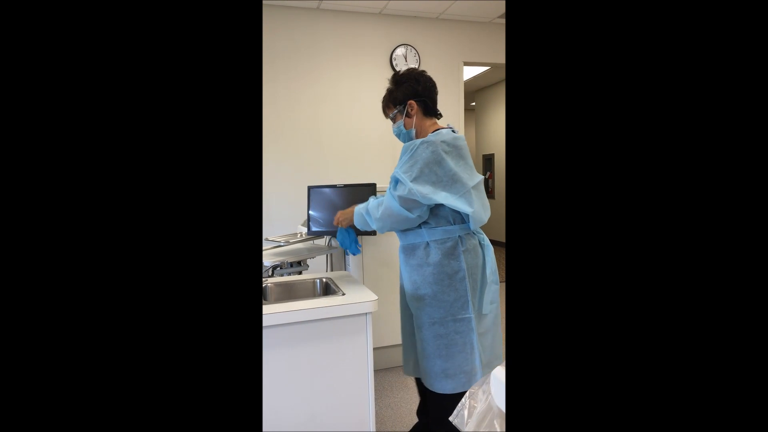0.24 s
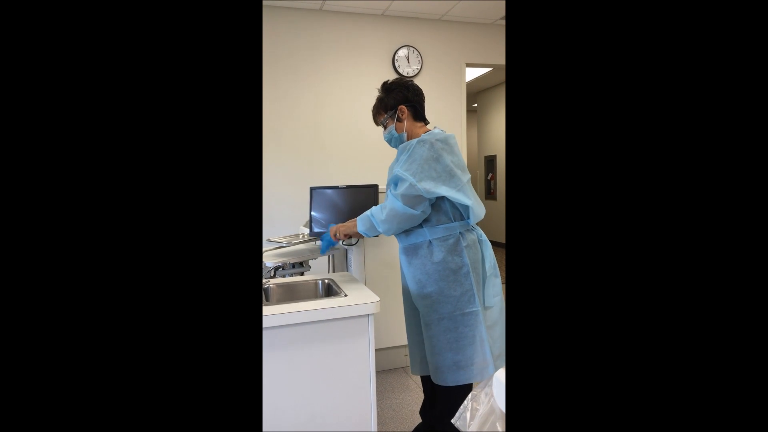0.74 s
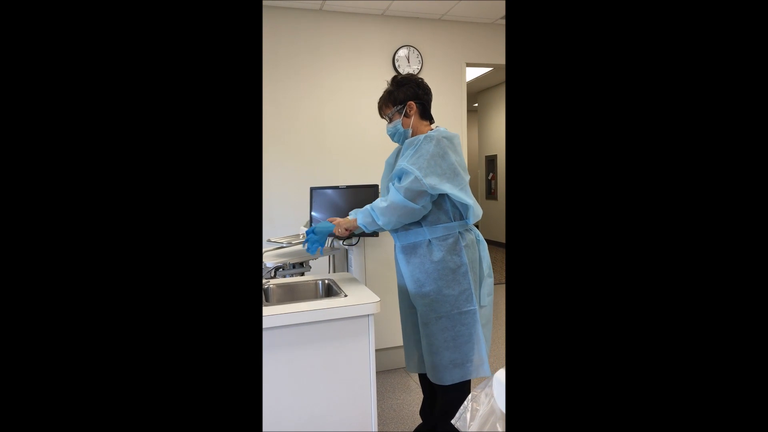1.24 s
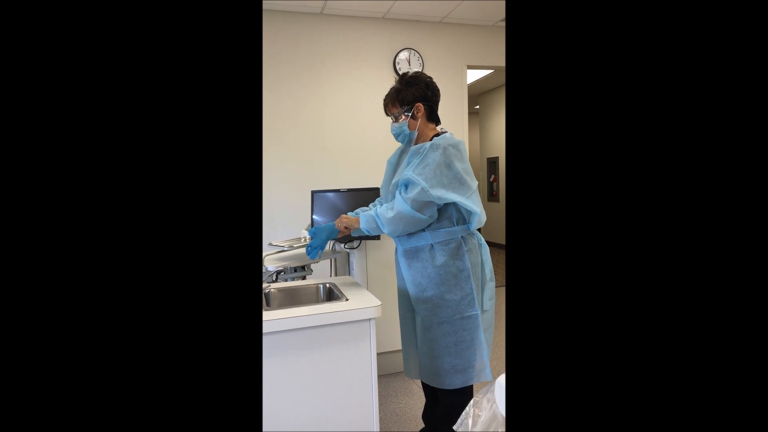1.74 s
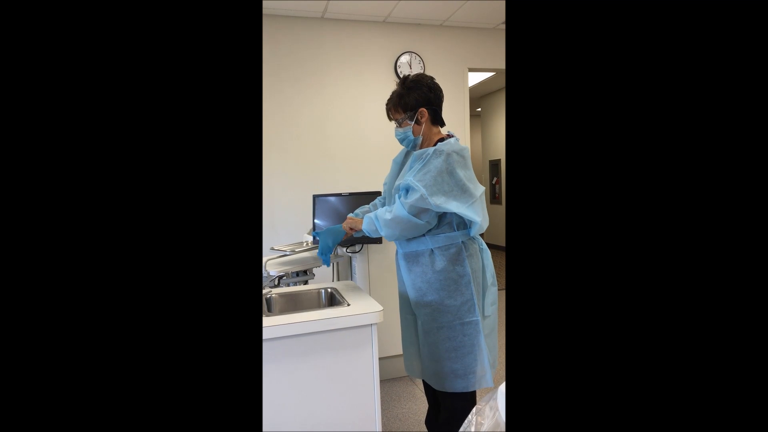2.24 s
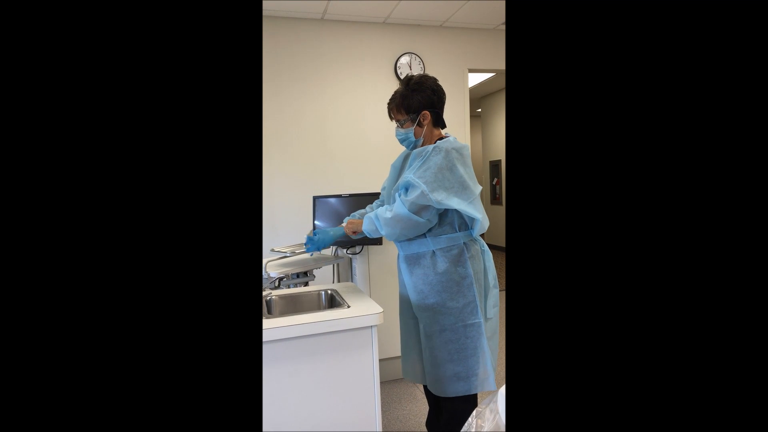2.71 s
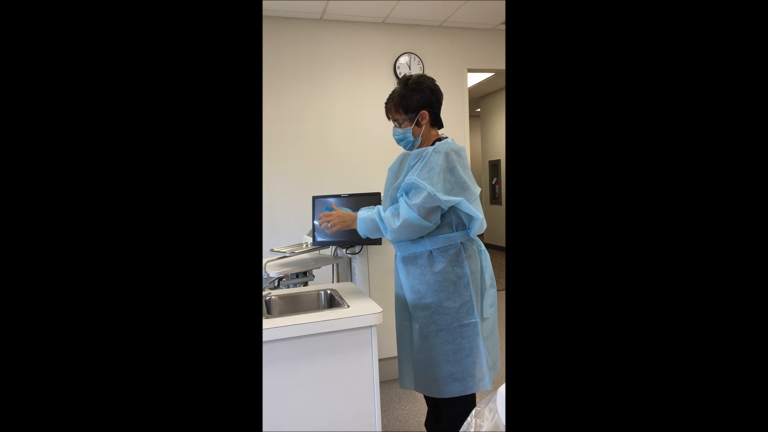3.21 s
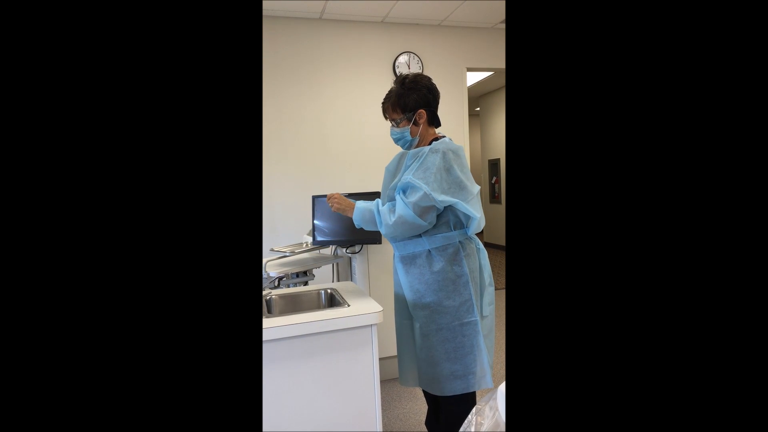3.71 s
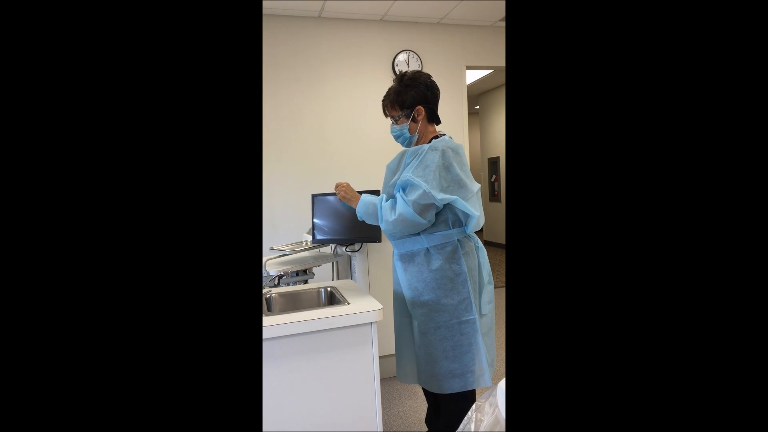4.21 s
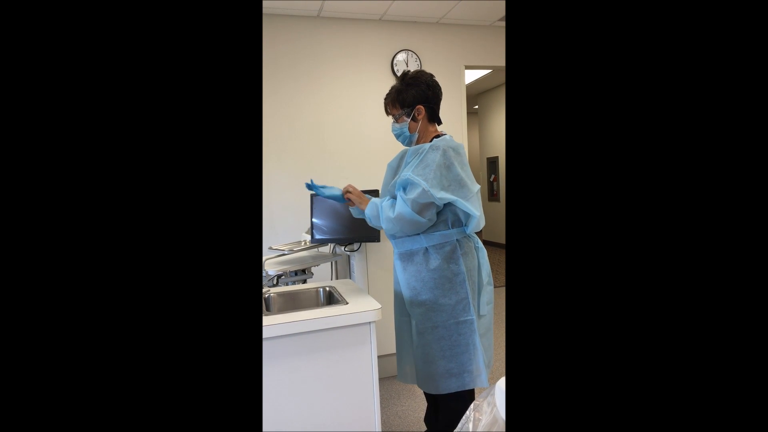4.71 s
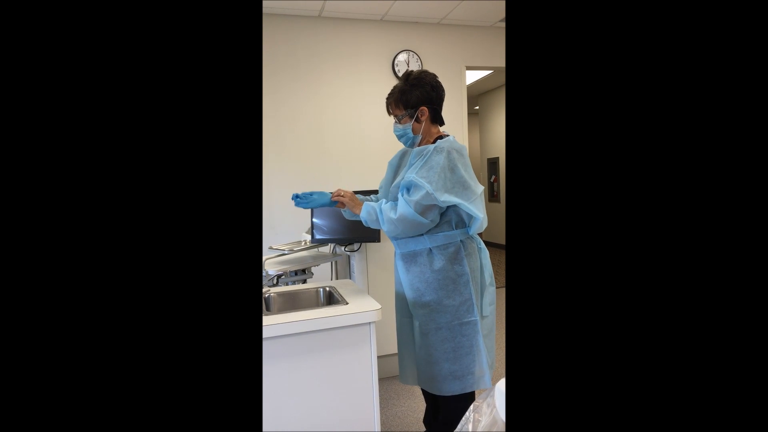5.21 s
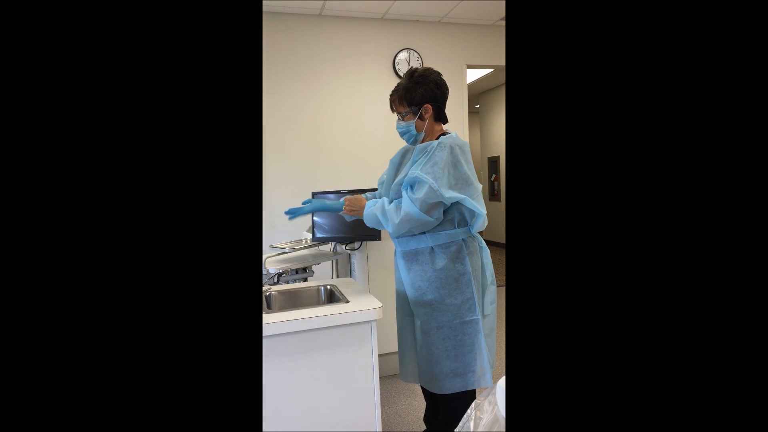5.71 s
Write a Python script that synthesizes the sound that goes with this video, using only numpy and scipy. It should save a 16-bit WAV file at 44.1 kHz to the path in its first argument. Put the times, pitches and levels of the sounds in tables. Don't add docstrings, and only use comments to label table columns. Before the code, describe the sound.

A low, even ventilation rumble runs throughout, with a very faint mains hum and soft microphone hiss. At first there are only tiny glove rustles and a small tick near 0.4 s. From about 1.15 to 1.75 s, thin film pops, puffs and crackles in small clusters, including a quick light cuff flutter at 1.3 s. A rounder, stronger pop comes at 2.2 s, a flat slap at 2.4 s, and the loudest, sharp snap at 2.67 s, followed by a looser flutter. More slaps and crackles fall at 2.85, 3.05 and 3.2 s. Then it thins to faint rubbing, with small pops near 3.9, 4.05 and 4.4 s. After a near-empty stretch, crackles at 5.6 s lead to a bright, crisp snap at 5.7 s and a little trailing rustle. Close hits have quick reflections and a short room tail; the treble occasionally dulls for an instant.

```python
import sys
import numpy as np
from scipy import signal
from scipy.fft import rfft, irfft, next_fast_len
from scipy.io import wavfile
from scipy.ndimage import uniform_filter1d, map_coordinates

SR = 44100
rng = np.random.default_rng(int(sys.argv[2]) if len(sys.argv) > 2 else 0)


def wrap_up_sound(samples):
    columns = np.atleast_2d(samples).T
    tamed = np.clip(columns, -1, 1)
    steps = np.round(tamed * 32767).astype(np.int16)
    wavfile.write(sys.argv[1], SR, steps)


def nominal_scale(level):
    x = np.asarray(level, float) / 20
    return 10 ** x


N = 262395

# frequency in Hz, density in dB per Hz.
DUCT_COLOUR = [(18, -59), (31, -11.5), (59, 3), (91, -14), (124, 3.5), (140, -3), (156, -11.5), (188, -7.5),
               (328, -19), (360, -18), (389, -26), (555, -32.5), (791, -42.5), (895, -39.5), (1200, -47.5),
               (1560, -80), (2640, -120)]
# frequency in Hz, level in dB rms.
MAINS_HUM = [(360.5, -65)]
# strongest moment in seconds, dull rustle in dB,
# bright rustle in dB, rise in seconds, fall in seconds.
STROKES = [(0.005, -66, -63, .01, 0.22), (.37, -78, -62, 0.021, .06), (1.25, -63.5, -67.5, 0.15, 0.13),
           (1.335, -52, -62, 0.12, 0.11), (1.85, -65, -73, 2.4, 0.68), (2.226, -42, -53, 0.0086, 0.03),
           (2.65, -59, -65, 0.067, 0.12), (2.68, -58, -68, 0.018, .3), (3.07, -62, -65.5, 1.8, 0.2),
           (3.55, -77, -73, 0.31, 0.81), (3.88, -58, -72, 0.015, 0.093), (4.42, -74, -74, .4, 0.094),
           (4.9, -68, -69.5, .6, 0.14), (5.6, -57, -63.5, 0.029, 0.12), (5.701, -53, -45.5, 0.03, 0.081),
           (5.8, -59, -63, .015, 0.18)]
# frequency in Hz, density in dB per Hz.
DULL_COLOUR = [(400, 8.5), (900, -1), (1700, 3.5), (3000, 1), (5000, -33.5), (8000, -40)]
# frequency in Hz, density in dB per Hz.
BRIGHT_COLOUR = [(1500, -32), (3500, 26.5), (5000, 20), (6300, 22), (8500, 14), (12000, 12), (15500, -26)]
# start in seconds, peak in dB, pitch in Hz.
PUFFS = [(.019, -53, 2540), (0.372, -54, 1360), (1.16, -48.5, 1570), (1.28, -45, 1330), (1.3, -44.5, 643),
         (1.328, -45.5, 936), (1.404, -52, 2100), (1.571, -45.5, 1188), (1.573, -53, 677),
         (1.574, -45, 2700), (1.959, -57, 952), (2.227, -34.5, 594), (2.668, -30, 12100),
         (2.668, -28, 7760), (2.855, -46, 990), (3.1883, -37, 5940), (3.779, -51.5, 2100),
         (3.886, -41.5, 2070), (5.555, -53, 895)]
# middle in seconds, level in dB rms, centre in Hz,
# width in Hz, length in seconds.
SCUFFS = [(0.023, -63, 5000, 8000, 0.023), (1.476, -65.5, 6500, 5000, 0.039), (1.743, -60, 2500, 3000, .03),
          (1.749, -64, 8000, 7900, 0.023), (1.878, -65, 3840, 2940, 0.055), (1.883, -59, 1730, 800, 0.044),
          (1.931, -66, 5000, 4000, .015), (2.12, -59.5, 1900, 900, 0.045), (2.35, -58, 1670, 600, 0.024),
          (2.892, -71, 6200, 1500, 0.21), (5.688, -52, 2300, 1200, 0.017), (2.953, -64, 4440, 4060, 0.062),
          (2.979, -56, 1530, 1800, 0.031), (3.044, -57, 2500, 3000, 0.017),
          (3.192, -55.5, 2980, 3000, 0.039), (3.547, -69, 2080, 900, 0.056),
          (4.167, -71.5, 2100, 890, 0.034), (4.379, -69, 2080, 1200, 0.064), (5.82, -58, 4870, 3480, 0.075)]
# start in seconds, pocket peak in dB,
# pocket pitch in Hz, skin peak in dB, skin pitch in Hz.
POPS = [(0.028, -53.5, 2580, -63, 7900), (0.368, -56, 1350, -48, 5850), (1.159, -36, 3020, -65, 3800),
        (1.297, -54, 1320, -41, 6040), (1.327, -39, 1950, -47, 5100), (1.573, -33, 1720, -45.5, 5070),
        (1.749, -34, 1940, -43, 4030), (2.134, -42, 1130, -55, 3770), (2.227, -20, 1600, -35.5, 3580),
        (2.416, -42, 993, -55, 5900), (2.6679, -18, 2970, -18, 6240), (2.6686, -29, 1900, -25.5, 3810),
        (2.751, -35, 3100, -39, 6550), (2.786, -44.5, 1000, -44, 3770), (3.048, -33, 1580, -43, 4480),
        (3.188, -32, 3520, -41.5, 4380), (4.047, -39.5, 1960, -48.5, 5700), (5.556, -38, 1640, -57, 4100),
        (5.59, -45.5, 1220, -55, 7850), (5.705, -31.5, 2290, -28.5, 5930), (5.831, -50.5, 880, -48.5, 4200),
        (5.836, -52, 2030, -50, 6040)]
# start in seconds, peak in dB.
CRACKS = [(0.043, -55), (0.056, -56), (0.366, -47.5), (1.159, -34.5), (1.299, -46), (1.328, -45),
          (1.749, -42), (2.229, -44), (2.416, -47.5), (2.668, -26), (3.048, -36.5), (3.189, -46.5),
          (3.215, -35.5), (5.557, -37), (5.59, -52), (5.646, -42), (5.705, -24), (5.833, -54)]
# frequency in Hz, density in dB per Hz.
CRACK_COLOUR = [(1500, -34), (4000, -8), (8000, -0.5), (11000, -4), (15700, -5), (16000, -46), (17000, -45)]
# start in seconds, peak in dB, centre in Hz.
SLAPS = [(0.371, -47.5, 2820), (1.159, -44, 970), (1.747, -36.5, 2390), (1.96, -44.5, 1450),
         (2.133, -60, 2600), (2.227, -29, 335), (2.4152, -31, 1520), (2.668, -28, 1370),
         (2.8548, -33.5, 1880), (3.0486, -38.5, 720), (3.0485, -30.5, 2180), (3.05, -49, 6540),
         (3.189, -39, 1130), (3.1883, -32, 2380), (4.044, -50, 3500), (4.37, -46.5, 1960),
         (5.5902, -49, 885), (5.7042, -26.5, 5260), (5.7042, -20.5, 10600)]
# first flap in seconds, peak in dB, pitch in Hz,
# first gap in seconds, number of flaps.
FLUTTERS = [
    (1.303, -49, 2000, 0.011, 5),
    (2.753, -38.5, 2000, .0145, 4),
]
# delay in seconds, level in dB.
ECHOES = [(.0058, -7), (.0072, -15), (.0082, -8.5), (0.0122, -9), (0.015, -16), (.0225, -21)]
# frequency in Hz, time to fall 60 dB in seconds.
ROOM_DECAY = [(300, 0.45), (2000, 0.31), (6000, 0.35), (12000, 0.2)]
# time in seconds, echoes over direct in dB, tail over direct in dB.
HANDS_FACING = [(0, 2, 4.5), (.37, 1, -9), (1.2, 0.5, -1), (1.3, -2, -4.5), (1.57, -6.5, -13),
                (2.13, 0.5, -9), (2.23, -10.5, -8.5), (2.42, -5, -8), (2.67, -3, -6.5), (2.86, -4, -10),
                (3.05, -0.5, -5), (3.2, -2.5, -7.5), (3.9, 3.5, -7), (4.05, 0, -6), (4.4, 1, -10),
                (5.6, -3, -9), (5.7, -12, -2)]
# frequency in Hz, density in dB per Hz.
HISS_COLOUR = [(410, -3), (700, -6), (800, -12), (900, -7), (2090, -11), (4500, -14.5), (4870, -18),
               (9500, -16.5), (10500, -19.5), (11300, -13.5), (12600, -13.5), (13300, -15.5),
               (15700, -20.5)]
# centre of the first in seconds, treble lost above in Hz, blinks in a row.
DROPOUTS = [(.1, 3500, 1), (.228, 3000, 1), (.932, 1100, 2), (1.1027, 1400, 1), (1.572, 5800, 1),
            (1.636, 2200, 1), (1.956, 3500, 1), (2.532, 2800, 1), (2.983, 4000, 1), (4.4947, 1500, 1),
            (5.0493, 700, 2), (5.4547, 2500, 1), (5.5613, 4500, 1)]

TREBLE_TOP_HZ = 15800
AIR_DB, AIR_SWAY_DB, GUST_DB = -41.5, -0.03, 1.2
STROKE_DB = 20
POCKET_CYCLES, SKIN_CYCLES, PUFF_CYCLES, SLAP_CYCLES = 0.9, 2, 1.37, 0.46
FLAP_SLOWS, FLAP_LOSS_DB = 1.15, 0.5
HISS_DB = -67
BLINK = 940
HIT_T = np.arange(SR // 40) / SR


def unit(x):
    return x / np.sqrt(np.mean(x ** 2) + 1e-20)


def along(points, hz):
    f, v = np.transpose(points)
    return np.interp(np.log(hz + 1), np.log(f + 1), v)


def coloured(x, spectrum, top_hz):
    m = next_fast_len(N + 8192)
    hz = np.fft.rfftfreq(m, 1 / SR)
    gain = nominal_scale(along(spectrum, hz)) * (hz < top_hz)
    return unit(irfft(rfft(x, m) * gain, m)[:N])


def burst(hz, cycles):
    u = HIT_T * hz / cycles
    return u * np.exp(1 - u) * np.sin(2 * np.pi * hz * HIT_T)


def slow_wander():
    return map_coordinates(rng.standard_normal(40), [np.arange(N) * 36 / N])


def gusty():
    z = signal.stft(rng.standard_normal(N), nperseg=2048)[2]
    patches = uniform_filter1d(rng.standard_normal(z.shape), size=4, axis=0)
    patches = uniform_filter1d(patches, size=4, axis=1)
    return signal.istft(z * nominal_scale(GUST_DB * unit(patches)), nperseg=2048)[1][:N]


def ventilation():
    out = nominal_scale(AIR_DB + AIR_SWAY_DB * slow_wander()) * coloured(gusty(), DUCT_COLOUR, TREBLE_TOP_HZ)
    drift_db = 2.2 * slow_wander()
    for hz, db in MAINS_HUM:
        out += nominal_scale(db + 3 + drift_db) * np.sin(2 * np.pi * hz * np.arange(N) / SR)
    return out


def rustle():
    out, t = np.zeros(N), np.arange(N) / SR
    swells = []
    for s, _, _, rise, fall in STROKES:
        away = np.maximum((s - t) / max(rise, 0.003), (t - s) / max(fall, 0.003))
        swells.append(nominal_scale(-STROKE_DB * away))
    for levels_db, spectrum in zip(np.transpose(STROKES)[1:3], (DULL_COLOUR, BRIGHT_COLOUR)):
        snaps = rng.random(N) < 2000 / SR
        creases = snaps * rng.standard_normal(N) * nominal_scale(1.4 * rng.exponential(size=N))
        out += nominal_scale(levels_db - 4.0) @ swells * coloured(creases, spectrum, TREBLE_TOP_HZ)
    return out


def puffs():
    return [(s, nominal_scale(db) * burst(hz, PUFF_CYCLES)) for s, db, hz in PUFFS]


def scuffs():
    out, t = np.zeros(N + SR), np.arange(SR // 5) / SR
    f = np.fft.rfftfreq(len(t), 1 / SR)
    for s, db, hz, width_hz, length in SCUFFS:
        grit = rng.standard_normal(len(t)) * nominal_scale(4 * rng.standard_normal(len(t)))
        resonance = (f * width_hz / np.hypot(hz * hz - f * f, f * width_hz)) ** 2
        resonance = resonance * (f < TREBLE_TOP_HZ)
        bell = np.exp(-8 * ((t - t.mean()) / length) ** 2)
        rub = unit(irfft(rfft(grit) * resonance, len(t))) * bell
        out[round(s * SR):][:len(t)] += nominal_scale(db) * rub
    return out[len(t) // 2:][:N]


def pops():
    hits = []
    for s, db, hz, skin_db, skin_hz in POPS:
        pocket = nominal_scale(db) * burst(hz, POCKET_CYCLES)
        skin = nominal_scale(skin_db) * burst(skin_hz, SKIN_CYCLES)
        hits.append((s, pocket + skin))
    return hits


def cracks():
    crackle = coloured(rng.standard_normal(N), CRACK_COLOUR, SR)
    fade = nominal_scale(-60 * HIT_T / 0.0035) * (1 - np.exp(-HIT_T / 0.0001))
    return [(s, nominal_scale(db) * fade * crackle[round(s * SR):][:len(HIT_T)]) for s, db in CRACKS]


def slaps():
    return [(s, nominal_scale(db) * burst(hz, SLAP_CYCLES)) for s, db, hz in SLAPS]


def flutters():
    hits = []
    for s, db, hz, gap, flaps in FLUTTERS:
        for k in range(round(flaps)):
            delay = gap * (FLAP_SLOWS ** k - 1) / (FLAP_SLOWS - 1)
            hits.append((s + delay, nominal_scale(db - FLAP_LOSS_DB * k) * burst(hz, SLAP_CYCLES)))
    return hits


def room(hit, s):
    when, echo_db, tail_db = np.transpose(HANDS_FACING)
    hz, t, z = signal.stft(rng.standard_normal(SR // 2), SR, nperseg=256)
    decay = nominal_scale(-60 * t / along(ROOM_DECAY, hz)[:, None])
    tail = signal.istft(z * decay, SR, nperseg=256)[1][:SR // 2]
    tail *= 1 - np.exp(-np.arange(len(tail)) / (0.003 * SR))
    tail *= nominal_scale(np.interp(s, when, tail_db)) / np.linalg.norm(tail)
    tail[0] = 1
    for delay, db in ECHOES:
        scatter_db = 1.5 * rng.standard_normal()
        level = nominal_scale(db + np.interp(s, when, echo_db) + scatter_db)
        tail[round(delay * SR)] += level * rng.choice([-1, 1])
    return signal.fftconvolve(hit, tail)


def in_room(hits):
    out = np.zeros(N + SR)
    for s, hit in hits:
        heard = room(hit, s)
        out[round(s * SR):][:len(heard)] += heard
    return out[:N]


def scene():
    hits = puffs() + pops() + cracks() + slaps() + flutters()
    return (ventilation() + rustle() + scuffs() + in_room(hits))[None]


def treble_dropouts(x):
    n, k = np.arange(2 * BLINK) + 0.5, np.arange(BLINK) + 0.5
    window = np.sin(np.pi * n / (2 * BLINK))
    basis = window * np.cos(np.pi / BLINK * np.outer(k, n + BLINK / 2))
    out, hz = x.copy(), k * SR / (2 * BLINK)
    for s, top_hz, blinks in DROPOUTS:
        threshold = np.select([hz > top_hz, hz > 900], [2.4, 1], 0)
        for start in round(s * SR) + BLINK * (np.arange(blinks) - 1):
            lines = basis @ x[start:start + 2 * BLINK]
            local = np.sqrt(uniform_filter1d(lines ** 2, size=41))
            lost = lines * (abs(lines) < threshold * local)
            out[start:start + 2 * BLINK] -= 2 / BLINK * lost @ basis
    return out


def top_cut(x):
    return signal.sosfilt(signal.butter(12, 16820, fs=SR, output="sos"), x)


def record(dry):
    hiss = nominal_scale(HISS_DB) * coloured(rng.standard_normal(N), HISS_COLOUR, TREBLE_TOP_HZ)
    bass_cut = signal.sosfilt(signal.butter(2, 36, "high", fs=SR, output="sos"), dry[0])
    mix = treble_dropouts(bass_cut + hiss)[None]
    return top_cut(mix)


dry = scene()
out = record(dry)
wrap_up_sound(out)
```